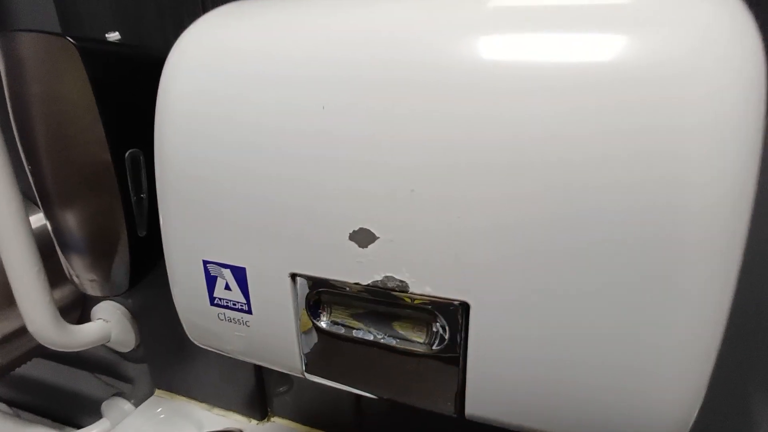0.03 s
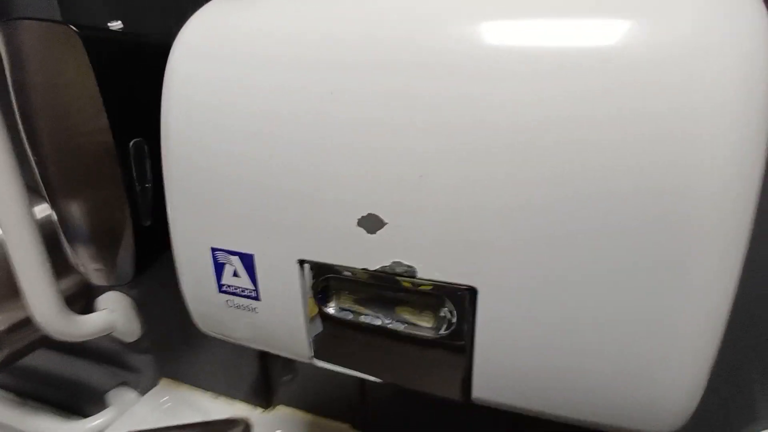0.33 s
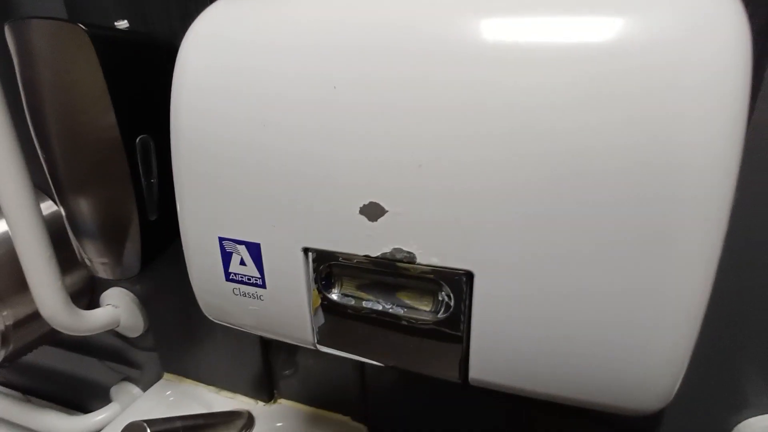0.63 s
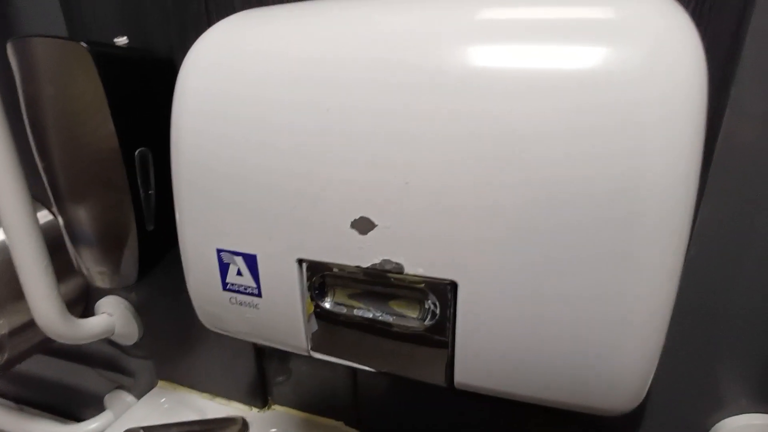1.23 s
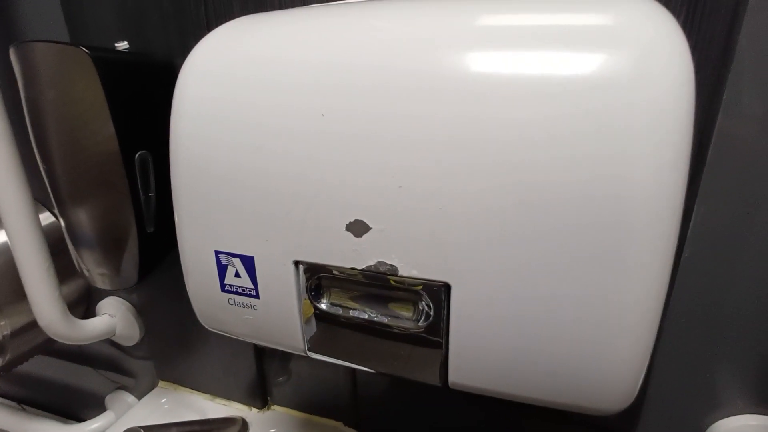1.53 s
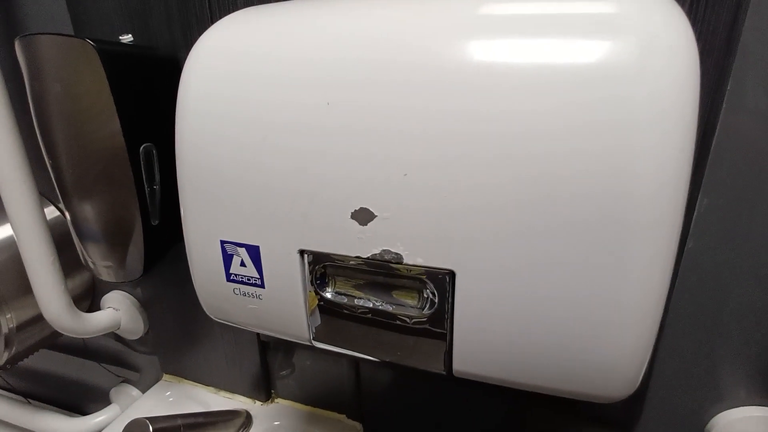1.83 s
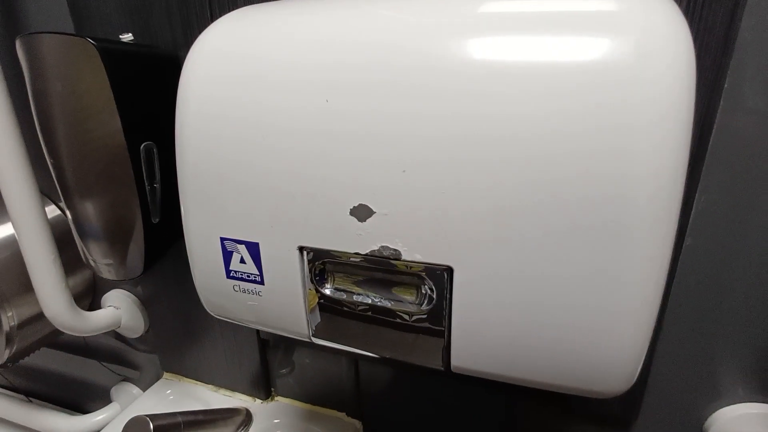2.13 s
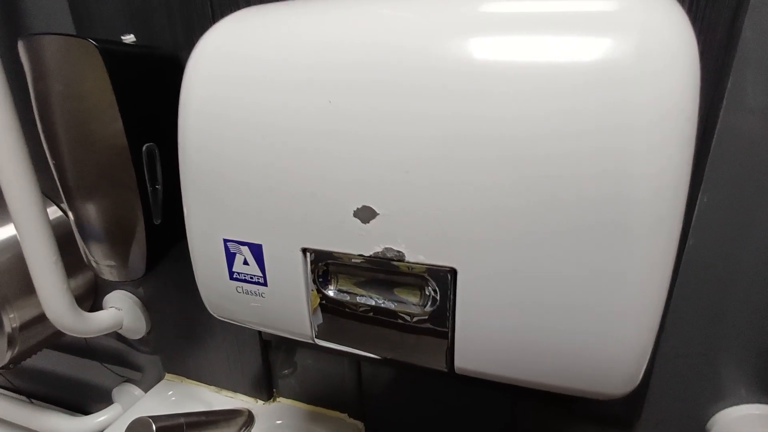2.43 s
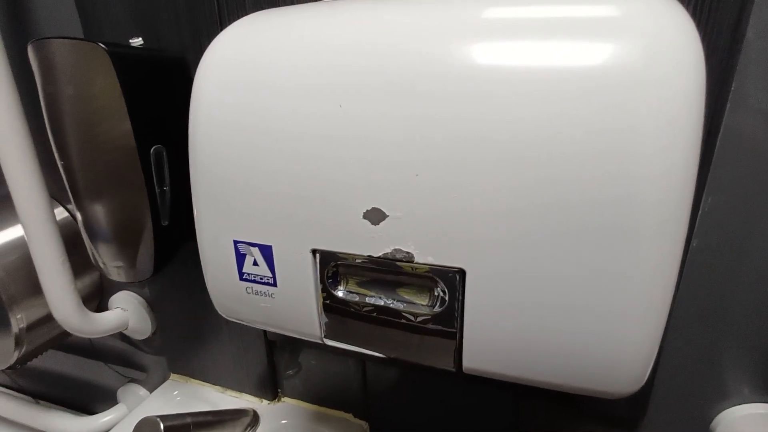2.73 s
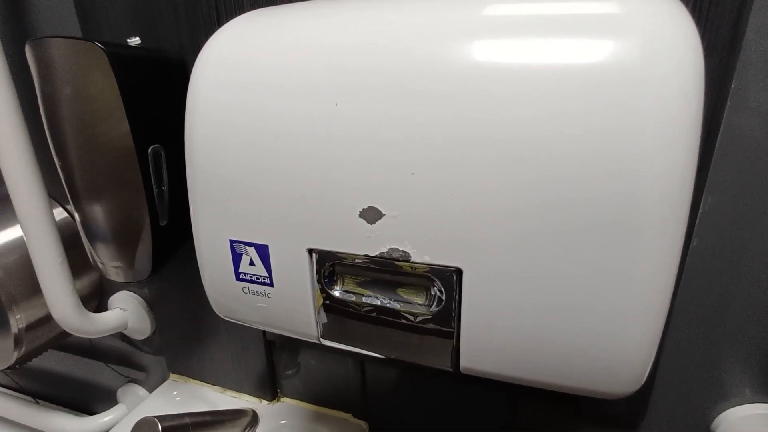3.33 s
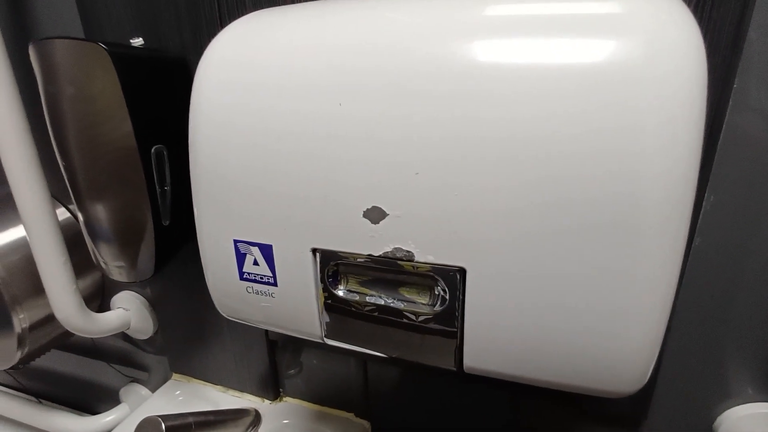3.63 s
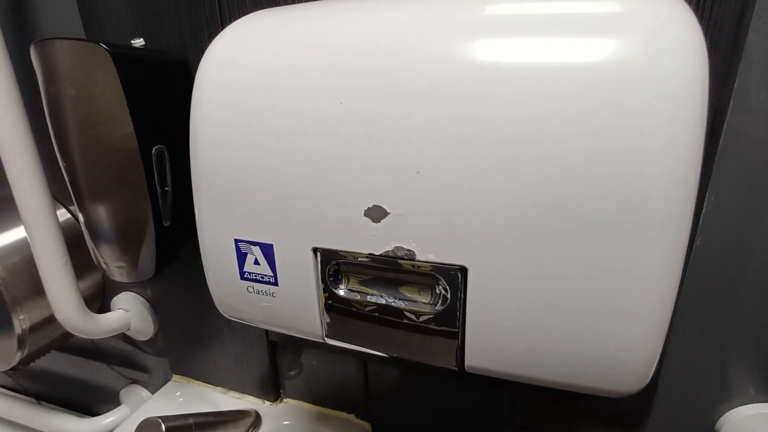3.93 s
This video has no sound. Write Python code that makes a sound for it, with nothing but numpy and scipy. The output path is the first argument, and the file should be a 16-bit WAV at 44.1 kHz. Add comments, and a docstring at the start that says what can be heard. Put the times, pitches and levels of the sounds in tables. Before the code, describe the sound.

A hand dryer's loud rush of air fades to a soft whoosh in a small washroom.

```python
"""A loud rush of air from a wall-mounted hand dryer booms in a small, hard-walled washroom.
The dryer switches off: the rush runs down within a second, a few resonances sing on,
and a low whoosh and a hiss slowly ebb. The air is noise, coloured by the room's resonances.
A hand cups the right microphone, shifts its grip early on, and taps the case once near the end."""
import sys
import numpy as np
from scipy import signal
from scipy.fft import rfft, irfft
from scipy.io import wavfile

SR = 44100
rng = np.random.default_rng(int(sys.argv[2]) if len(sys.argv) > 2 else 0)


def store_wav(level_fs):
    """Save 16-bit WAV to argv[1]."""
    pcm = np.round(np.clip(np.atleast_2d(level_fs), -1, 1) * 32767)
    wavfile.write(sys.argv[1], SR, pcm.T.astype(np.int16))


N = 176400
TIME = np.arange(N) / SR
FREQUENCIES = np.arange(N // 2 + 1) * SR / N   # Hz


FLUTTER_DB, FLUTTER_PER_S = 0.71, 17   # turbulence shakes the level of the jet
BASS_HZ, BASS_WIDTH_HZ = 206, 170
# tone of the rushing air: (frequency [Hz], left level [dB per Hz], right level [dB per Hz])
RUSH_TONE = [(20, -86, -88), (40, -81, -76), (70, -66, -66), (86, -66, -65), (118, -55.5, -58.5),
             (219.6, -51.5, -50), (318, -57, -59.5), (414.5, -51, -49.5), (479, -58, -58.5),
             (680, -57, -56), (890, -59, -58), (1030, -52, -52.5), (1355, -59, -59), (1490, -58.5, -56),
             (2010, -63, -63.5), (2430, -62, -57.5), (2920, -64, -55.5), (3860, -67.5, -59),
             (5070, -69.5, -62.5), (6640, -75, -66), (7970, -75, -81), (8500, -76, -77),
             (9300, -79.5, -71.5), (12000, -75.5, -77), (13800, -79, -87.2), (15700, -80, -102)]
# chance wavering of the bass level in the air noise: (time [s], level change [dB])
BASS_WAVER = [(0, .8), (.16, 2), (.36, -1), (.65, .4), (.82, 1.8), (1.07, 0), (1.38, 2.9), (1.6, 0.4),
              (1.8, 1.1), (2.0, -1.3), (2.7, -3.5)]
# the rush dies away: (frequency [Hz], start of fade [s], fade speed [dB per s])
RUSH_FADE = [(181, 1.75, 19.5), (402, 1.824, 26.5), (990, 1.78, 28), (2620, 1.846, 27.5), (5340, 1.82, 21),
             (11000, 1.73, 22.5)]
def dryer():
    """The jet of air blows steadily, its bass wavering by chance, then dies away once the motor is off."""
    def waver_and_fade(hz, s):
        start, speed = at_hz(RUSH_FADE, hz)
        waver = np.interp(s, *np.transpose(BASS_WAVER)) * bell(hz - BASS_HZ, BASS_WIDTH_HZ)
        return waver - speed * np.maximum(s - start, 0)
    jet = airflow(RUSH_TONE, boost_column=2, echo_db=-4)
    flutter = from_db(FLUTTER_DB * drift(FLUTTER_PER_S))
    return moving_filter(jet * flutter, waver_and_fade)


# resonances that outlast the jet:
# (pitch [Hz], width [Hz], left level [dB], right level [dB], start of fade [s], fade speed [dB per s])
LASTING_RINGS = [(143.4, 11.5, -39, -40.5, 2.23, 24), (185.7, 10.7, -34, -34, 2.13, 26),
                 (716, 17, -37, -38, 2.1, 31), (755, 20, -45, -45, 2.08, 30), (1562, 84, -45, -48, 2.2, 21),
                 (4716, 70, -67, -44, 2.17, 13)]
def rings():
    """A few resonances, stirred by the air, sing on while the fan coasts."""
    out = 0
    for pitch, width, left_db, right_db, start, speed in LASTING_RINGS:
        peak = 1 / (1 + (2 * (FREQUENCIES - pitch) / width) ** 2)
        ring = irfft(turbulence() * peak, N)
        level_db = np.array([[left_db], [right_db]]) - speed * np.maximum(TIME - start, 0)
        out = out + ring / ring.std() * from_db(level_db)
    return out


EBB_START_S, WHOOSH_TONE_AT_S = 2.93, 3.7
# tone of the whoosh, partly faded: (frequency [Hz], left level [dB per Hz], right level [dB per Hz])
WHOOSH_TONE = [(20, -99, -97), (40, -94, -96), (67.5, -75.5, -70.5), (86, -90, -82), (120, -68.5, -72),
               (212, -73, -75), (330, -81, -79.5), (424, -78, -73.5), (490, -76.5, -74), (650, -83, -83.5),
               (804, -83.5, -88), (1000, -78.5, -78), (1380, -85, -86), (1620, -84, -82),
               (2180, -85.5, -86), (2660, -86, -77), (3800, -93, -82.5), (5360, -85, -75.5),
               (6540, -92, -84), (7900, -93, -96.5), (9600, -96, -97.5), (11500, -94, -99),
               (13600, -99.6, -109.7), (15700, -100.6, -128)]
# the whoosh ebbs: (frequency [Hz], fade speed [dB per s])
WHOOSH_FADE = [(170, 2), (400, 1.5), (1000, 5), (2500, 3.5), (5000, 4), (11000, 3)]
def whoosh():
    """A low whoosh with a thin hiss lies under the rush, stays behind and ebbs slowly."""
    def ebb(hz, s):
        speed = at_hz(WHOOSH_FADE, hz)[0]
        return speed * (WHOOSH_TONE_AT_S - np.maximum(s, EBB_START_S))
    return moving_filter(airflow(WHOOSH_TONE, boost_column=3, echo_db=1.5), ebb)


# where room and dryer housing boom: (pitch [Hz], width [Hz], rush boost [dB], whoosh boost [dB])
BOOMS = [(100, 8, 5.5, -3), (145, 7.7, 7, 3), (166, 5, 7, 7), (186.5, 9.8, 7, 6), (198.2, 8.75, 20.5, 2),
         (224, 12, 12.5, 4.3), (241.5, 9.8, 14, 9), (271, 14, 16, 12), (326, 13, 11.5, 5),
         (377.5, 7.3, 4, 5), (398, 14, 3.5, -5), (450, 18, 4, 4.5), (502, 8.5, 6, 1), (584, 11.3, 7.5, 5),
         (620, 9, 1.5, 9), (678, 16, 3, 0), (717, 18, 4, 1), (757, 16, 6, 2), (1002, 12, 7, 5),
         (1061, 20, 4.5, -1), (1179, 16, 3.5, 1), (1250, 25, 3, 1), (1411, 22, 5, 1), (1464, 23, 5.5, 0),
         (1603, 16, 4.5, 2), (1660, 22, 4, 1), (2730, 170, 0, 5), (3340, 170, -.5, 5.5)]
def airflow(tone, boost_column, echo_db):
    """Swirling air, heard through the resonances and the echo of the room."""
    boom_db = sum(row[boost_column] * bell(FREQUENCIES - row[0], row[1] / np.sqrt(2)) for row in BOOMS)
    colour = from_db(at_hz(tone, FREQUENCIES) + boom_db)
    return irfft(turbulence() * colour * room(echo_db), N)


# how alike left and right sound: (frequency [Hz], likeness [-1 to 1])
STEREO_LIKENESS = [(30, .45), (60, .7), (110, .95), (260, .98), (310, .82), (430, .9), (520, .5), (590, .8),
                   (645, 0), (710, .55), (820, .25), (910, .62), (1070, .7), (1350, .1), (1480, .3),
                   (1750, -.2), (2000, 0)]
def turbulence():
    """Spectrum of swirling air: white noise, alike on both sides in the bass, unrelated in the treble."""
    shared, opposed = rfft(rng.standard_normal((2, N))) * np.sqrt(SR / 2)
    alike = at_hz(STEREO_LIKENESS, FREQUENCIES)
    return np.sqrt((1 + alike) / 2) * shared + np.sqrt((1 - alike) / 2) * opposed * [[1], [-1]]


# the shifting grip: (time [s], hollow's pitch [Hz], its boost [dB], upper mids [dB], high treble [dB])
HAND_GRIP = [(0, 4620, 5.5, 2, 0), (.28, 4550, 7.5, 2, -0.5), (.42, 4330, 6.5, 5, -2.5),
             (.64, 4050, 5, 2.5, -6), (.75, 4450, 7.5, 5, -3.5), (.86, 4810, 8.5, 2, -2),
             (1.85, 4680, 8.5, -1, -1.5), (2.9, 4840, 4.5, -1.5, 2.5), (4, 4860, 7, -4.5, -1.5)]
def cupped_hand(hz, s):
    """The hollow of the hand resonates, lower and weaker as the grip closes; gives a gain in dB."""
    times, *columns = np.transpose(HAND_GRIP)
    hollow_hz, hollow_db, mids_db, treble_db = [np.interp(s, times, c) for c in columns]
    octave = np.log2(hz + 1)   # so the widths below are in octaves
    return (hollow_db * bell(octave - np.log2(hollow_hz), width=0.22)
            + mids_db * bell(octave - np.log2(2790), width=0.38)
            + treble_db * bell(octave - np.log2(10000), width=0.56))


TAP_S, TAP_GAIN_DB, TAP_LEFT_DB, TAP_BAND_HZ = 3.0983, -10.8, -37, (710, 5100)
BOUNCE_S, BOUNCE_DB = .0043, -20   # the finger touches again, lightly
# the notes of the tapped case: (pitch [Hz], relative level [dB], time to fade by 60 dB [s])
CASE_NOTES = [(1050, 1.2, 0.009), (1800, 2.3, 0.005), (2750, -1.8, .0048), (5200, -5, .0045)]
def tap():
    """A finger makes one dry tick on the case, with a faint bounce, beside the right microphone."""
    tick = 0
    for start, touch_db in ((TAP_S, 0), (TAP_S + BOUNCE_S, BOUNCE_DB)):
        age = np.maximum(TIME - start, 0)
        for hz, db, fade_s in CASE_NOTES:
            level = (age > 0) * from_db(touch_db + db - 60 * np.minimum(age / fade_s, 10))
            tick = tick + level * np.cos(2 * np.pi * hz * age)
    band = signal.butter(2, TAP_BAND_HZ, "band", fs=SR, output="sos")
    tick = signal.sosfilt(band, signal.sosfilt(band, tick))
    return from_db(TAP_GAIN_DB) * tick * from_db([[TAP_LEFT_DB], [0]])


ECHO_FADE_S, ECHO_LOW_HZ, WALL_DULL_HZ = 0.36, 600, 3470
def room(echo_db):
    """The hard walls add a short echo to the direct sound; gives a gain per side and frequency."""
    tail = rng.standard_normal((2, N)) * from_db(-60 * TIME / ECHO_FADE_S)
    tail /= np.sqrt(np.sum(tail ** 2, axis=1, keepdims=True))
    bass_cut = FREQUENCIES ** 2 / (FREQUENCIES ** 2 + ECHO_LOW_HZ ** 2)
    echo_gain = from_db(echo_db) * bass_cut / np.hypot(1, FREQUENCIES / WALL_DULL_HZ)
    return (1 + echo_gain * rfft(tail)) / np.hypot(1, echo_gain)


def from_db(db):
    """Turns decibels into a number to multiply by."""
    return 10 ** (np.asarray(db) / 20)


def at_hz(table, hz):
    """Looks up a table at any frequency, gliding between its rows on an octave scale."""
    row_hz, *columns = np.transpose(table)
    return np.array([np.interp(np.log(hz + 1e-9), np.log(row_hz), c) for c in columns])


def bell(offset, width):
    """A rounded hump of height 1."""
    return np.exp(-(offset / width) ** 2)


def drift(rate):
    """A slow random wobble with a typical size of 1."""
    memory = np.exp(-2 * np.pi * rate / SR)
    slow = signal.lfilter([1], [1, -2 * memory, memory * memory], rng.standard_normal(N + SR))[SR:]
    return slow / slow.std()


def moving_filter(sound, gain_db):
    """Changes a sound's tone over time, following gain_db(frequency, time)."""
    hz, s, frames = signal.stft(sound, SR, nperseg=1024, noverlap=768)
    frames = frames * from_db(gain_db(hz[:, None], s))
    return signal.istft(frames, SR, nperseg=1024, noverlap=768)[1][..., :N]


def scene():
    """The air reaches both microphones, the right one through the cupped hand; the tap is added."""
    left, right = dryer() + rings() + whoosh()
    return np.array([left, moving_filter(right, cupped_hand)]) + tap()


CUTOFF_HZ = 15850
def record(dry):
    """The very highest treble is cut off steeply."""
    return signal.sosfilt(signal.ellip(12, .1, 80, CUTOFF_HZ, fs=SR, output="sos"), dry)


dry = scene()
out = record(dry)
store_wav(out)
```